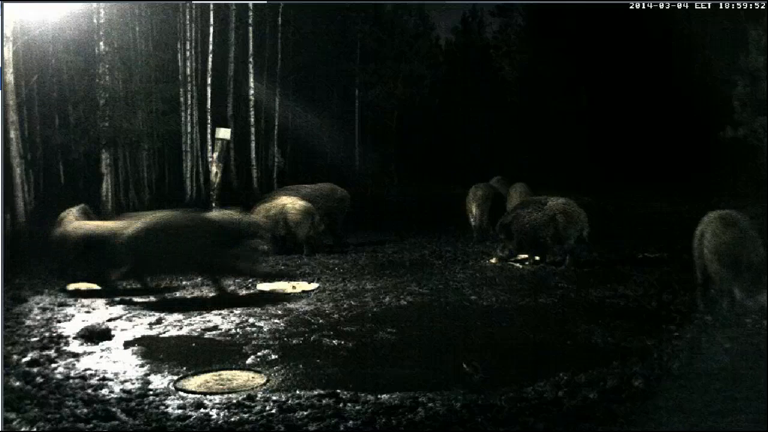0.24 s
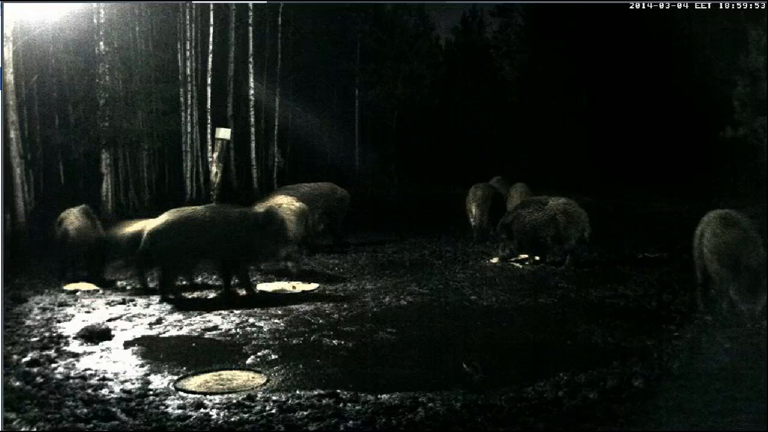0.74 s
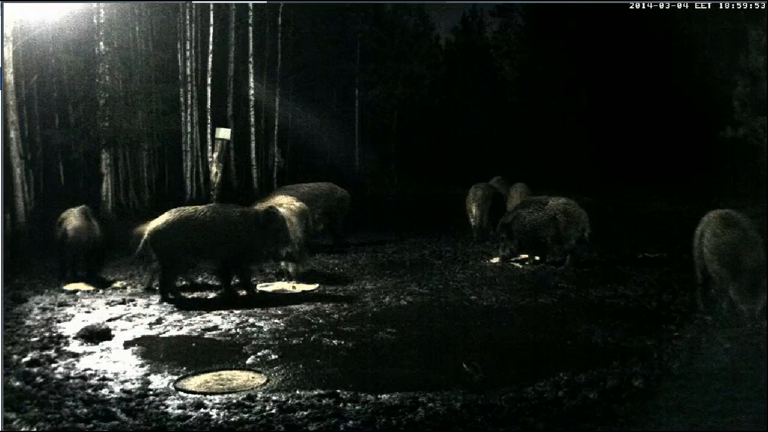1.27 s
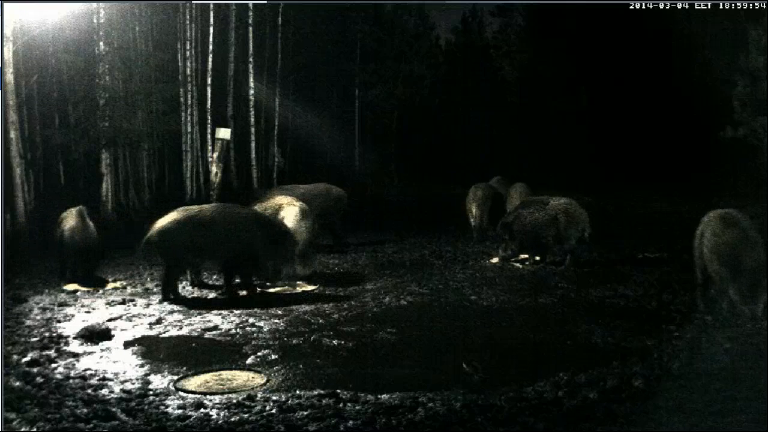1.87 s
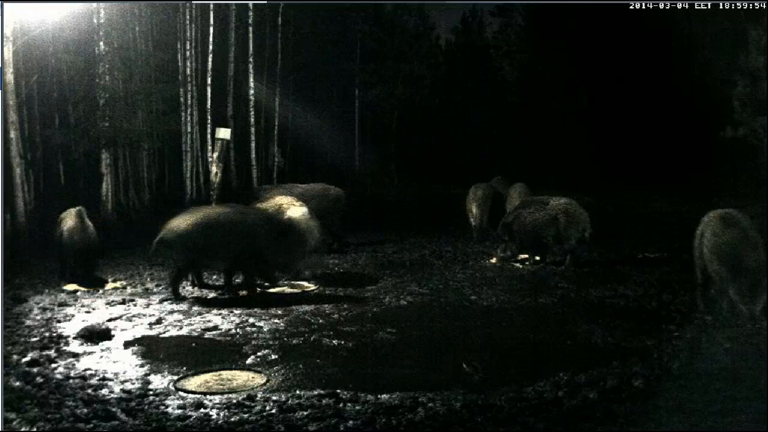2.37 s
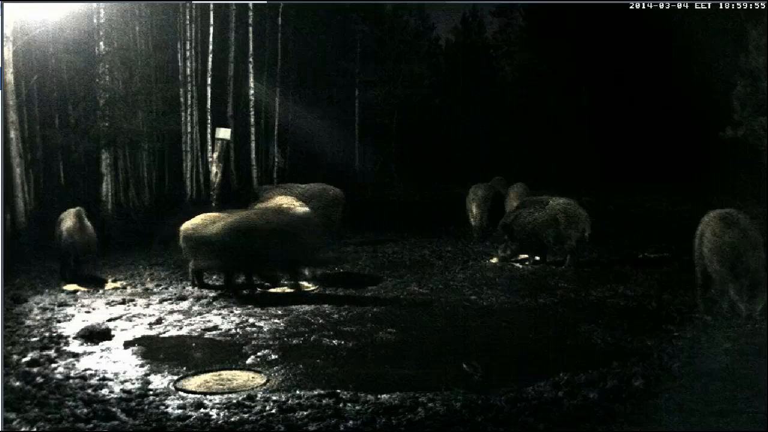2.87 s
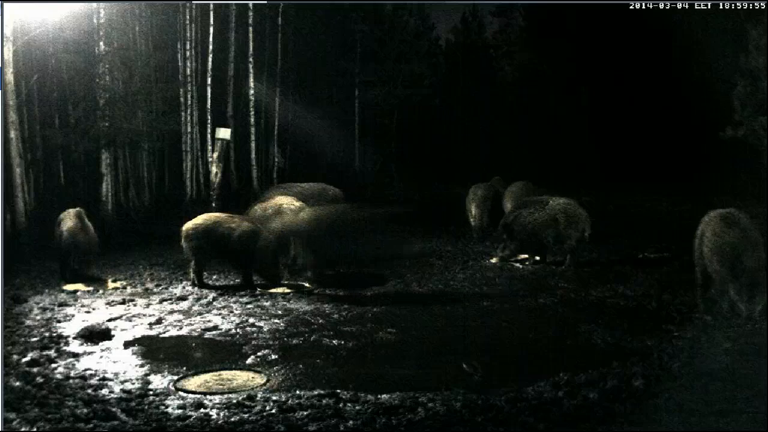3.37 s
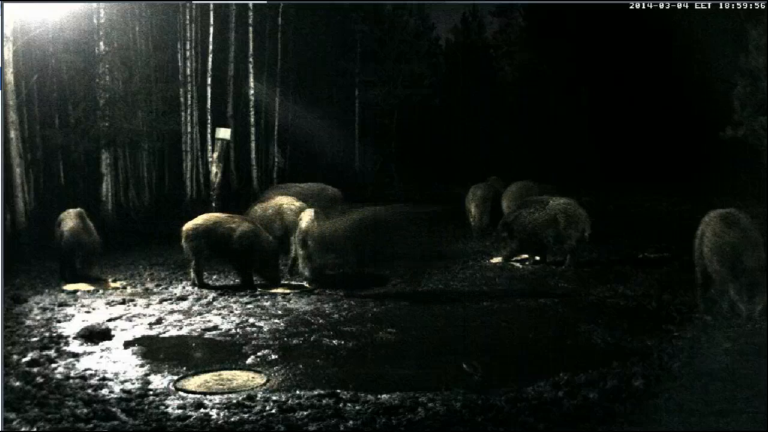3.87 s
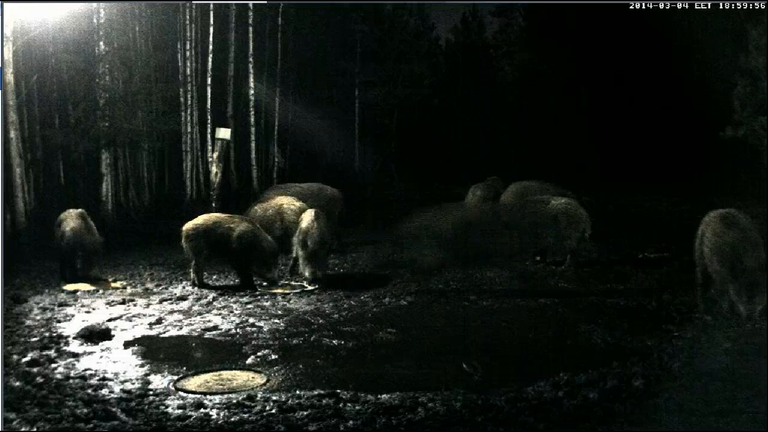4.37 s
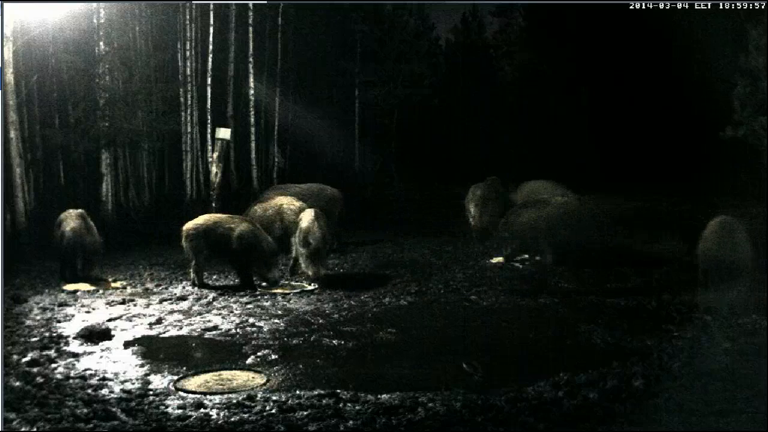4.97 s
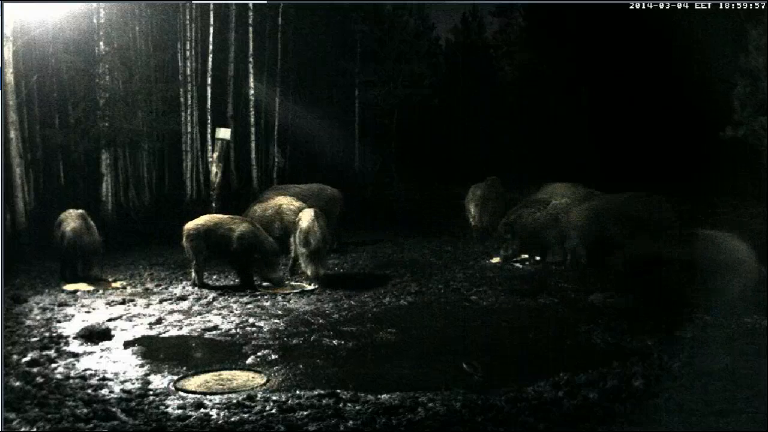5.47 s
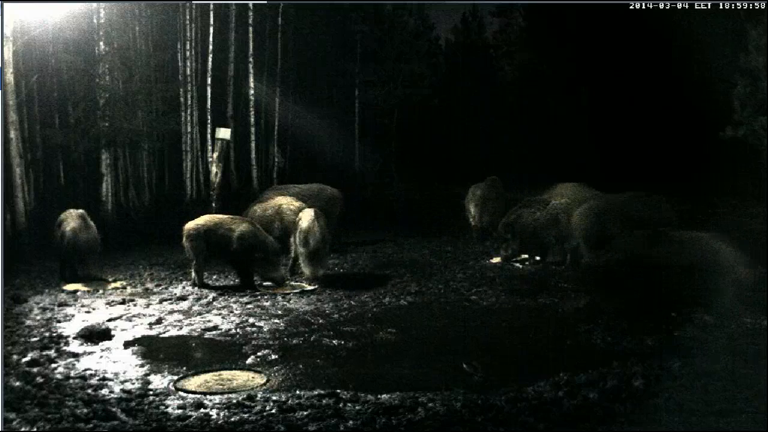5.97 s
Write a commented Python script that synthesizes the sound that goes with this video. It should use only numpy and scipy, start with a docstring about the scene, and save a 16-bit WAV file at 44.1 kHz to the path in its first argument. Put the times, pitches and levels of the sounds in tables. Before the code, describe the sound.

A herd of wild boar feeds on muddy ground in a forest clearing at night. Small wet chewing clicks and stirred litter run throughout, dotted with jaw smacks, short crunches and a few dull hoof thuds. One sharp bite stands out late on. A distant engine hums over a low rumble the whole time. The sound is quiet and narrow, like a telephone, with a faint echo from the trees.

```python
"""Wild boar feed on muddy ground in a forest clearing at night, heard through a narrow-band recorder. From the
start a far engine hums over a low rumble, slowly sinking in pitch, and the herd chews and stirs the wet litter
in clumps of tiny clicks. Throughout, jaws smack, ringing the mouth's resonances; bites and steps crunch, hooves
and bodies thud, and the trunks scatter each sound back. Near 4.8 s the hardest bite trips the gain control, and
the level creeps back up."""
import sys
import numpy as np
from scipy import signal
from scipy.fft import rfft, irfft
from scipy.io import wavfile

SR = 44100
rng = np.random.default_rng(int(sys.argv[2]) if len(sys.argv) > 2 else 0)


def generate_wav(sig):
    """Save sig (samples, or channels by samples) to the path in sys.argv[1] as 16-bit PCM at SR."""
    pcm = np.round(np.clip(np.atleast_2d(sig).T, -1, 1) * 32767).astype(np.int16)
    wavfile.write(sys.argv[1], SR, pcm)


N = 274302
TIME = np.arange(N) / SR
BAND_EDGE_HZ = 3713   # upper edge of the recorder's narrow channel

# how busily the herd feeds: t/s, relative level of wet chewing/dB, relative level of crisp litter/dB
FEEDING_ACTIVITY = [(0, -60.5, -64.5), (.3, -55, -54.5), (.65, -61.5, -63.5), (.85, -57, -59),
                    (1.15, -56, -61.5), (1.6, -62.5, -62), (1.85, -53.5, -58.5), (2.0, -58, -64.5),
                    (2.27, -61.5, -68), (2.5, -56, -61), (2.9, -58, -57.5), (3.45, -54.5, -60.5),
                    (3.85, -59, -58.5), (4.1, -53.5, -56), (4.6, -55.5, -60), (5.25, -56.5, -55),
                    (5.75, -60, -64), (5.97, -56.5, -59.5), (6.22, -61, -56.5)]


def from_db(db):
    """Amplitude ratio of a level: a factor of ten for every 20 dB."""
    return 10 ** (np.asarray(db) / 20)


def rms_one(x):
    """Normalisation to unit root-mean-square amplitude."""
    return x / np.sqrt(np.mean(x ** 2) + 1e-20)


def in_time(rows):
    """Linear interpolation of each column over the times in the first, sample by sample."""
    times, *columns = np.transpose(rows)
    return [np.interp(TIME, times, column) for column in columns]


def at_hz(spectrum, hz):
    """Gain of a spectrum, its levels interpolated over logarithmic frequency."""
    f, db = np.transpose(spectrum)
    return from_db(np.interp(np.log(hz + 1e-9), np.log(f), db))


def add(out, start_s, sound):
    """Superposition: a short sound adds to what is already there."""
    start = int(round(start_s * SR))
    low, high = max(start, 0), min(start + len(sound), N)
    out[low:high] += sound[low - start:high - start]


def drift(corner_hz):
    """Slow random fluctuation: low-passed Gaussian noise of unit rms."""
    hz = np.fft.rfftfreq(N, 1 / SR)
    return rms_one(irfft(rfft(rng.standard_normal(N)) / (1 + (hz / corner_hz) ** 2), N))


def noise(spectrum):
    """Spectral shaping turns white noise into coloured noise of unit rms."""
    gain = at_hz(spectrum, np.fft.rfftfreq(N, 1 / SR))
    return rms_one(irfft(rfft(rng.standard_normal(N)) * gain, N))


def band(x, hz, kind, order=2):
    """Butterworth filter, maximally flat in its passband."""
    return signal.sosfilt(signal.butter(order, hz, kind, fs=SR, output="sos"), x + 1e-18)


def resonate(x, hz, width_hz):
    """Two-pole resonator with unit gain at its peak."""
    radius = np.exp(-np.pi * width_hz / SR)
    numerator = np.array([1, 0, -1]) * (1 - radius ** 2) / 2
    denominator = [1, -2 * radius * np.cos(2 * np.pi * hz / SR), radius ** 2]
    return signal.lfilter(numerator, denominator, x + 1e-18)


def grains(per_s, spread_db, size):
    """Poisson process: impulses of either sign at random moments, mostly weak, a few strong."""
    strength = from_db(spread_db * np.minimum(rng.exponential(1, size), 4))
    return (rng.random(size) < per_s / SR) * strength * rng.choice([-1, 1], size)


def pop(t, hz, t60, rise_cycles):
    """Damped oscillation that builds up smoothly and decays exponentially; peak 1."""
    onset = 1 - np.exp(-(t * hz / rise_cycles) ** 2)
    wave = np.sin(2 * np.pi * hz * t) * from_db(-60 * t / t60) * onset
    return wave / np.abs(wave).max()


def ringing_clicks(colour, per_s, spread_db, clump_db, q, count=36):
    """Impulse excitation: clicks come in clumps, each ringing one of a bank of resonators; unit rms."""
    clicks = grains(per_s, spread_db, size=N) * from_db(clump_db * drift(18))
    resonator = rng.integers(0, count, N)
    pitches = np.geomspace(colour[0][0], colour[-1][0], count)
    return rms_one(sum(at_hz(colour, hz) * resonate(clicks * (resonator == k), hz, hz / q)
                       for k, hz in enumerate(pitches)))


def engine(start_hz=119.64, sag_hz_per_s=1.13, waver_db=0.5, hum_gain_db=0.35, rumble_db=-55):
    """A sinking harmonic series wavers on its long path through the air, over a steady dull rumble."""
    # strength of the hum: t/s, relative level of fundamental/dB, relative level of second harmonic/dB
    hum_levels = [(0, -72.5, -61), (.35, -64, -63), (.95, -70.5, -60), (1.17, -69.5, -53.5),
                  (1.8, -73, -59), (2.35, -68, -53), (3.4, -65.5, -56.5), (3.8, -65.5, -57.5),
                  (4.35, -64.5, -51.5), (4.95, -66.5, -58.5), (5.8, -71.5, -54.5), (6.22, -67.5, -56.5)]
    # higher harmonics: harmonic number, level re the second/dB
    overtones = [(3, -22.5), (4, -19.5)]
    # spectrum of the rumble: f/Hz, relative density level/dB
    rumble_spectrum = [(25, -30.5), (85, -29), (120, -15.5), (145, -7.5), (170, 0), (215, -2), (270, -6),
                       (380, -8), (500, -18.5), (700, -20), (1200, -26)]
    first_db, second_db = in_time(hum_levels)
    harmonics = [(1, first_db), (2, second_db)] + [(round(k), second_db + db) for k, db in overtones]
    phase = 2 * np.pi * np.cumsum(start_hz - sag_hz_per_s * TIME) / SR
    hum = np.zeros(N)
    for k, db in harmonics:
        amplitude = np.sqrt(2) * from_db(db + hum_gain_db + waver_db * drift(13))
        hum += amplitude * np.sin(k * phase + rng.uniform(0, 2 * np.pi))
    return hum + from_db(rumble_db) * noise(rumble_spectrum)


def chewing(gain_db=-0.68):
    """Many small wet clicks excite well-damped resonances of the mouths."""
    # colour of the chewing: f/Hz, relative level/dB
    colour = [(450, -2.5), (650, -8), (900, 3.5), (1300, 1), (1750, 5), (2200, -4.5), (2800, -10)]
    chew_db, _ = in_time(FEEDING_ACTIVITY)
    clicks = ringing_clicks(colour, per_s=900, spread_db=0.5, clump_db=3.5, q=11.5)
    return from_db(chew_db + gain_db) * clicks


def litter(gain_db=-2):
    """Snouts and hooves stir the litter, whose crisp clicks excite high, sharp resonances."""
    # colour of the litter: f/Hz, relative level/dB
    colour = [(1900, 0.5), (2400, -2.5), (2800, -4.5), (3400, 8), (4200, -17)]
    _, litter_db = in_time(FEEDING_ACTIVITY)
    clicks = ringing_clicks(colour, per_s=700, spread_db=1.5, clump_db=1.5, q=24.0)
    return from_db(litter_db + gain_db) * clicks


def nibbles(per_s=6, over_chewing_db=14.5, spread_db=0.5, low_hz=1200, high_hz=3500, count=64):
    """The herd's faint smacks, a Poisson process as loud as the chewing is busy: t/s, level/dB, f/Hz."""
    wait, strength, pitch = rng.random((count, 3)).T
    times = np.cumsum(-np.log(1 - wait)) / per_s
    chew_db, _ = in_time(FEEDING_ACTIVITY)
    db = np.interp(times, TIME, chew_db) + over_chewing_db + spread_db * (2 * strength - 1)
    hz = low_hz * (high_hz / low_hz) ** pitch
    return [row for row in zip(times, db, hz) if row[0] < TIME[-1]]


def smacks(snap_db=-4, upper_db=-29, crackle_db=-30, crackle_t60=0.052, hard_bite_db=-38.5):
    """Cavity resonance: a dry snap of the jaws rings two modes of the mouth as breaking food crackles."""
    # the loudest smacks of the jaws: t/s, relative peak level/dB, mouth resonance f/Hz
    loud_smacks = [(.008, -38, 3180), (.169, -40, 3300), (.424, -34, 2500), (.455, -32, 3200),
                   (.613, -39, 3460), (.834, -37.5, 2160), (.889, -34, 3410), (1.007, -41.5, 910),
                   (1.177, -31, 1180), (1.1785, -28, 1800), (1.179, -35.5, 3070), (1.224, -38.5, 1170),
                   (1.344, -41.5, 1620), (1.635, -35, 1730), (1.713, -37, 2980), (2.164, -42.5, 810),
                   (2.503, -39, 3350), (2.541, -37, 1800), (2.889, -38, 3400), (2.972, -36, 1100),
                   (2.998, -40.5, 3400), (3.167, -33.5, 1720), (3.183, -35, 2070), (3.319, -41, 1200),
                   (3.354, -30.5, 1740), (3.41, -34, 892), (3.487, -40, 1560), (3.682, -35, 1700),
                   (3.702, -32, 1840), (3.709, -34.5, 2970), (3.742, -31, 3430), (3.7475, -28.5, 1280),
                   (3.764, -29.5, 1780), (3.998, -35, 1910), (4.135, -33.5, 1310), (4.211, -41, 3280),
                   (4.344, -39, 1000), (4.51, -31.5, 1740), (4.5268, -22, 1810), (4.666, -38, 2280),
                   (4.7647, -15.5, 1996), (4.773, -26, 2210), (4.911, -31.5, 1640), (4.936, -41, 3500),
                   (5.017, -31.5, 2040), (5.104, -34.5, 1870), (5.186, -34.5, 2130), (5.262, -39, 3200),
                   (5.2712, -32, 1440), (5.467, -40.5, 2430), (5.497, -32.5, 2930), (5.498, -35.5, 1090),
                   (5.5303, -30, 3320), (5.613, -36, 1820), (5.789, -45, 1350), (5.901, -39.5, 1000),
                   (5.953, -35, 1350), (6.134, -33, 3070), (6.189, -41.5, 2740)]
    out, t = np.zeros(N), TIME[:4096]
    snap = band(signal.unit_impulse(len(t)), [1100, 4200], "band")
    snap = snap / np.abs(snap).max()
    for s, db, hz in list(loud_smacks) + nibbles():
        t60 = 0.014 * (1800 / hz) ** 0.16   # a wider, lower mouth rings longer
        t60 *= from_db(0.17 * min(hard_bite_db - db, 0))   # a hard bite shuts the mouth sooner
        dryness = min(hz / BAND_EDGE_HZ, 1) ** 2   # low smacks are wet and soft, high ones crisp
        mouth = pop(t, hz, t60, rise_cycles=1.02) + dryness * from_db(snap_db) * snap
        upper = from_db(upper_db) * pop(t, hz * rng.uniform(1.1, 2.4), t60, rise_cycles=0.21)
        fractures = band(grains(per_s=3200, spread_db=1.0, size=len(t)), [1000, 4000], "band", order=3)
        crackle = rms_one(fractures) * from_db(crackle_db - 60 * t / crackle_t60)
        # upper mode and crackle gain only half as many decibels as the bite: hard bites sound purer
        add(out, s, from_db(db) * mouth + from_db(db / 2) * (upper + crackle))
    return out


def crunches(gain_db=-5.5, bypass=0.085):
    """Acoustic emission: a bite or a step in mud frees a swell of fractures, coloured by a resonance."""
    # crunches and squelches: centre t/s, relative rms level/dB, duration/s, resonance f/Hz
    bursts = [(0.169, -44.5, 0.012, 2220), (0.306, -48.5, 0.073, 2000), (0.444, -46, 0.038, 2580),
              (0.615, -51, 0.03, 2400), (0.729, -44, .03, 2560), (0.911, -43, 0.022, 2420),
              (1.138, -46, .025, 1500), (1.189, -42.5, 0.04, 1800), (1.436, -47, 0.055, 1630),
              (1.531, -42.5, 0.018, 1220), (1.643, -42, 0.024, 1520), (1.80, -42.5, .018, 1490),
              (1.883, -53.5, 0.048, 1160), (2.022, -48, 0.036, 1350), (2.366, -52.5, .025, 1600),
              (2.546, -46.5, 0.038, 1920), (2.739, -48.5, 0.019, 1520), (2.834, -47, 0.032, 2000),
              (3.191, -37, 0.022, 2250), (3.348, -43.5, 0.03, 1650), (3.599, -40, 0.02, 2600),
              (3.685, -39, .007, 3200), (3.752, -37.5, 0.023, 2190), (3.94, -40, 0.021, 1480),
              (4.032, -43.5, .022, 1740), (4.158, -45, 0.058, 1440), (4.339, -45, 0.011, 1260),
              (4.44, -44, 0.032, 2360), (4.535, -47, 0.023, 1770), (4.797, -38.5, .045, 2200),
              (4.9, -41.5, .014, 2800), (4.944, -46, 0.026, 3200), (5.069, -39, 0.019, 2400),
              (5.2, -47, 0.024, 2550), (5.272, -41.5, 0.024, 2240), (5.31, -39, 0.031, 1640),
              (5.537, -44.5, 0.015, 1150), (5.619, -44, 0.063, 1890), (5.944, -38, 0.011, 1800),
              (6.135, -42, 0.011, 3200)]
    out, t = np.zeros(N), TIME[:8192]
    middle = t[-1] / 2
    for s, db, length, hz in bursts:
        width_hz = 1470 * (hz / 2000) ** 2.46   # wet squelches are narrow, dry crunches broad
        swell = np.exp(-2 * ((t - middle) / length) ** 2)
        fractures = band(grains(per_s=900, spread_db=1.5, size=len(t)) * swell, [800, 4300], "band")
        stage_hz = width_hz * np.sqrt(2)   # two broader stages in series give steeper flanks
        burst = resonate(resonate(fractures, hz, stage_hz), hz, stage_hz) + bypass * fractures
        add(out, s - middle, from_db(db + gain_db) * rms_one(burst) * np.sqrt(np.mean(swell ** 2)))
    return out


def thuds(gain_db=-2.0, body_db=-15):
    """Impacts of hooves and bodies excite a low, heavily damped mode and a little narrow-band noise."""
    # dull impacts: t/s, relative peak level/dB, f/Hz, decay time T60/s
    impacts = [(0.168, -42, 403, 0.025), (1.178, -34.5, 290, 0.021), (1.869, -42, 330, .065),
               (1.894, -44.5, 462, 0.053), (2.252, -45, 182, 0.064), (2.743, -41.5, 360, 0.036),
               (3.757, -38.5, 375, .038), (4.764, -33.5, 340, .013), (5.466, -33.5, 228, .03),
               (5.4955, -28.5, 223, 0.03), (5.529, -32.5, 200, 0.013)]
    out, t = np.zeros(N), TIME[:8192]
    for s, db, hz, t60 in impacts:
        body = rms_one(resonate(rng.standard_normal(len(t)), hz, width_hz=160))
        body *= from_db(body_db - 60 * t / (2 * t60))
        add(out, s, from_db(db + gain_db) * (pop(t, hz, t60, rise_cycles=0.24) + body))
    return band(band(out, 125, "high", order=5), 700, "low")


def forest(x, first_echo_s=0.0068, t60=0.37, gain_db=-10):
    """Scattering: the trunks return many small echoes that weaken exponentially with delay."""
    t = TIME[:SR]
    echoes = grains(per_s=2500, spread_db=4.5, size=len(t)) * from_db(-60 * t / t60) * (t > first_echo_s)
    return from_db(gain_db) * signal.fftconvolve(x, echoes / np.sqrt(np.sum(echoes ** 2)))[:N]


def gain_control(x, threshold_db=-18.5, depth_db=4.5, recover_db_per_s=0.8):
    """Automatic gain control: a peak over the threshold cuts the gain fast, and it recovers slowly."""
    tripped_db = depth_db * (np.abs(x) > from_db(threshold_db))
    recovery_db = recover_db_per_s * TIME
    cut_db = np.maximum.accumulate(tripped_db + recovery_db) - recovery_db
    return x * from_db(-band(cut_db, 160, "low", order=1))   # attack of about a millisecond


def scene():
    """Superposition of the feeding herd, its echoes from the trunks and the far engine."""
    herd = chewing() + litter() + smacks() + crunches() + thuds()
    return (herd + forest(herd) + engine())[None]


def record(dry, hiss_db=-84.0, fizz_db=-30, cutoff_hz=15750):
    """Band limiting: above a telephone-wide channel lie only hiss and a fizz that follows crisp sounds."""
    # spectrum of the fizz: f/Hz, relative density level/dB
    fizz_spectrum = [(4000, 2), (5500, -4), (6800, 6), (8000, 1.5), (10500, 0), (13000, 10), (16000, -13)]
    # spectrum of the recorder's hiss: f/Hz, relative density level/dB
    hiss_spectrum = [(4000, -2), (5200, -1.3), (6800, -0.35), (9500, 0.39), (12500, 1.1), (16000, -0.36)]
    narrow = band(band(dry[0], BAND_EDGE_HZ, "low", order=14), 6400, "low", order=8)
    crispness = np.abs(band(narrow, 2760, "high", order=6))
    fizz = from_db(fizz_db) * crispness * noise(fizz_spectrum)
    hiss = from_db(hiss_db) * noise(hiss_spectrum)
    steep_lowpass = signal.ellip(10, .1, 70, cutoff_hz, fs=SR, output="sos")
    return signal.sosfilt(steep_lowpass, gain_control(narrow + fizz + hiss))[None]


dry = scene()
out = record(dry)
generate_wav(out)
```